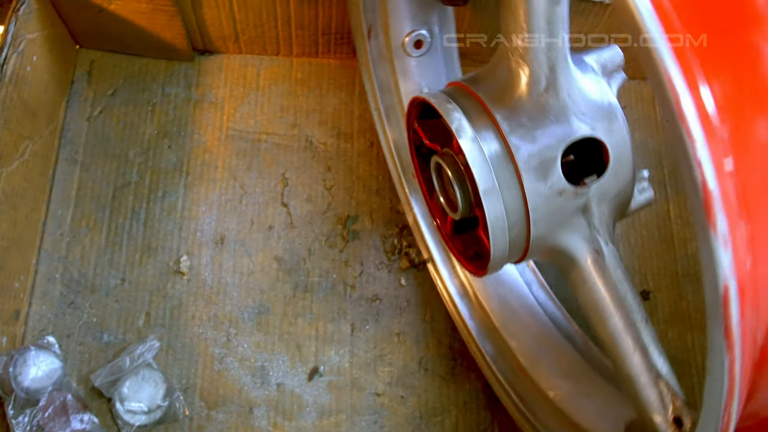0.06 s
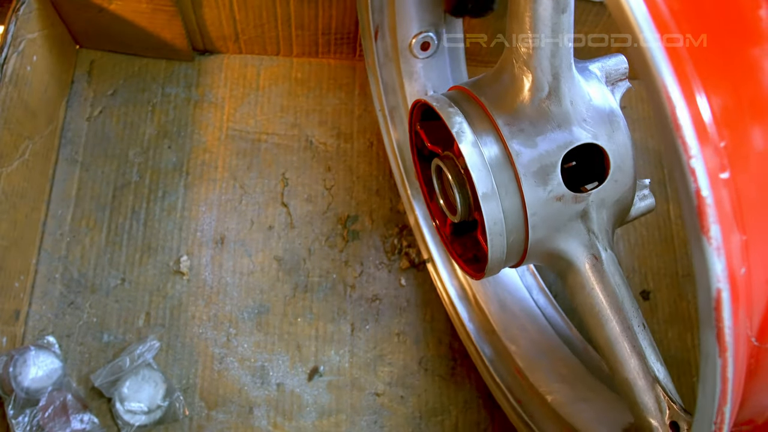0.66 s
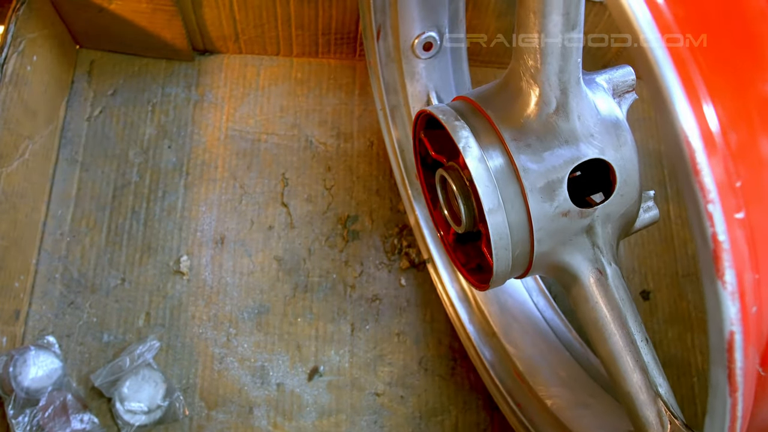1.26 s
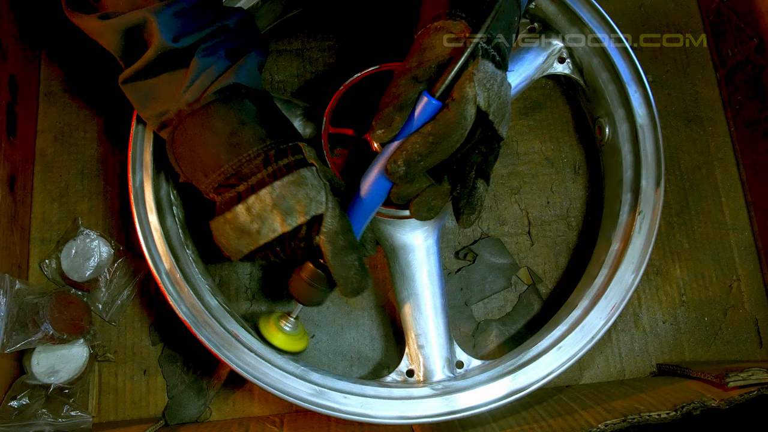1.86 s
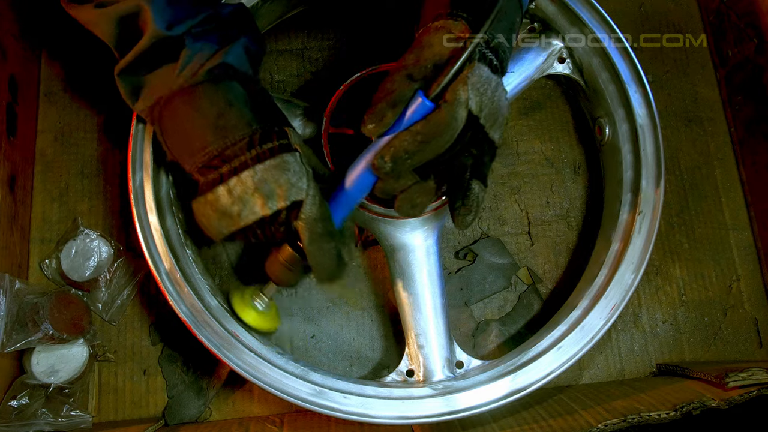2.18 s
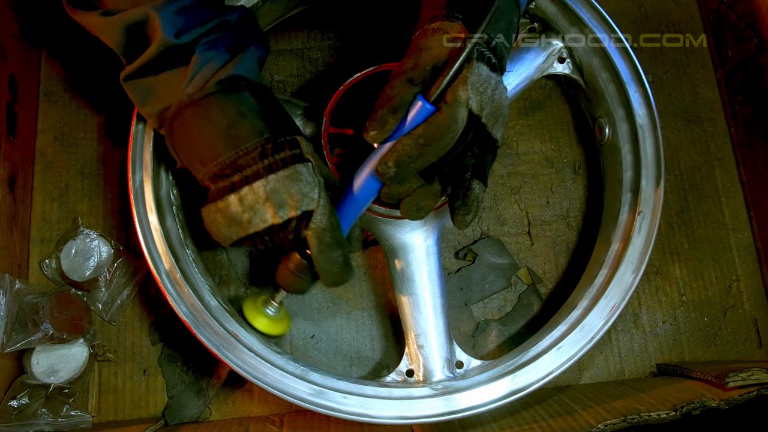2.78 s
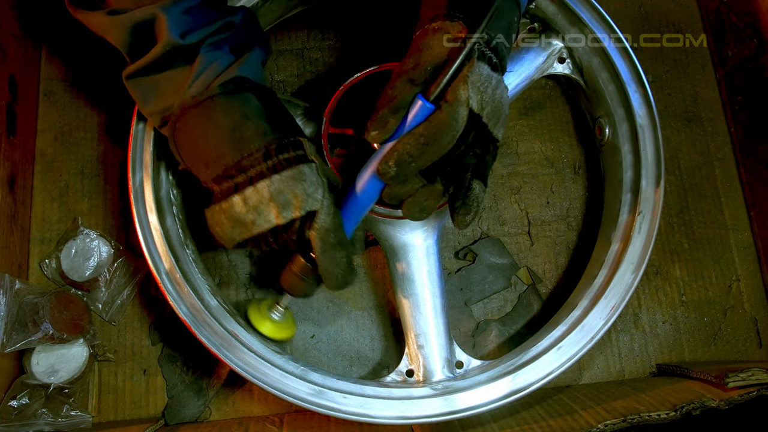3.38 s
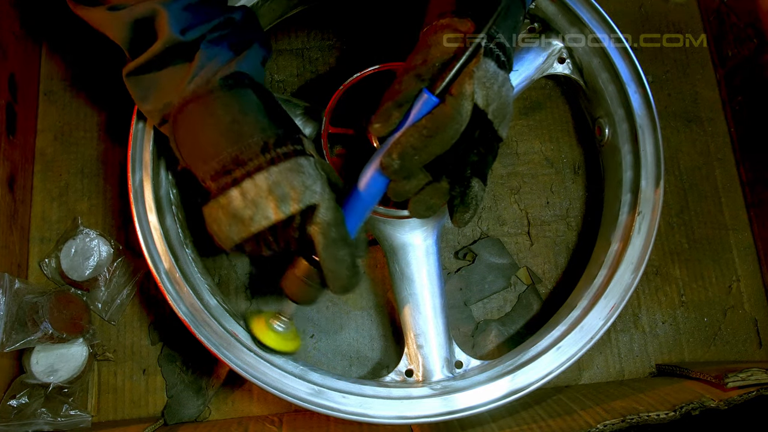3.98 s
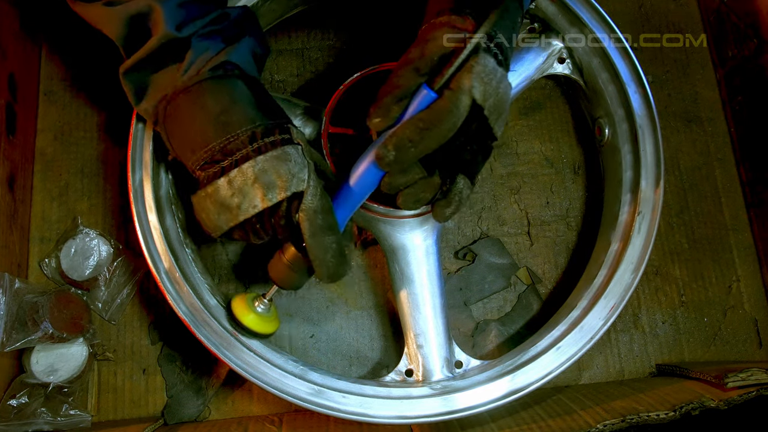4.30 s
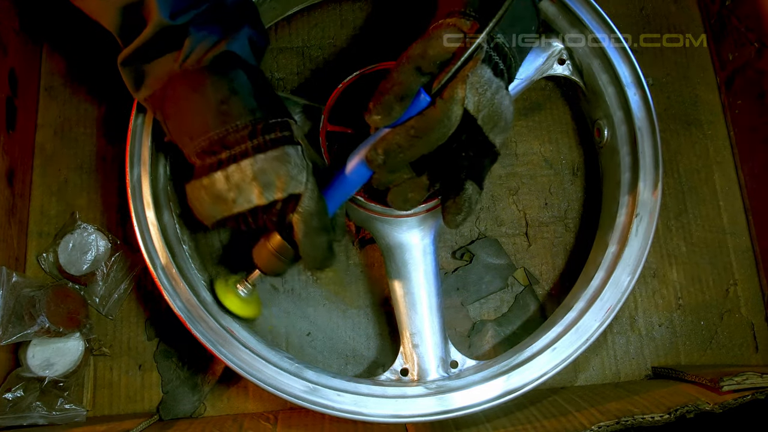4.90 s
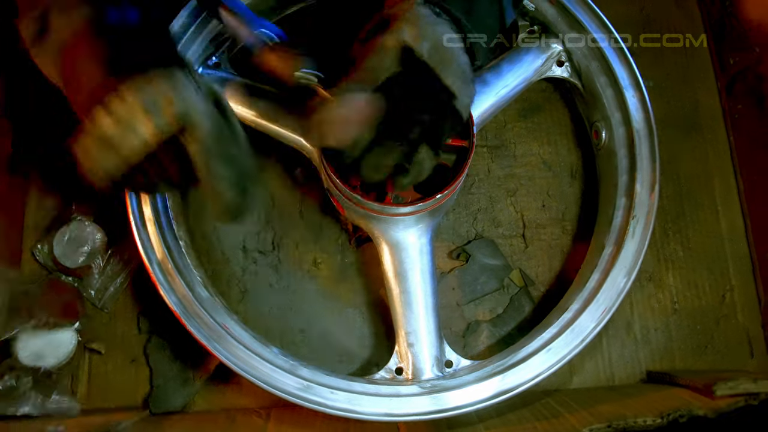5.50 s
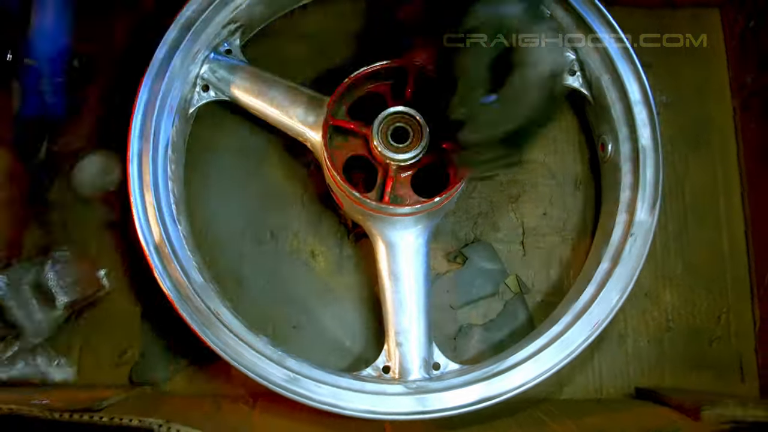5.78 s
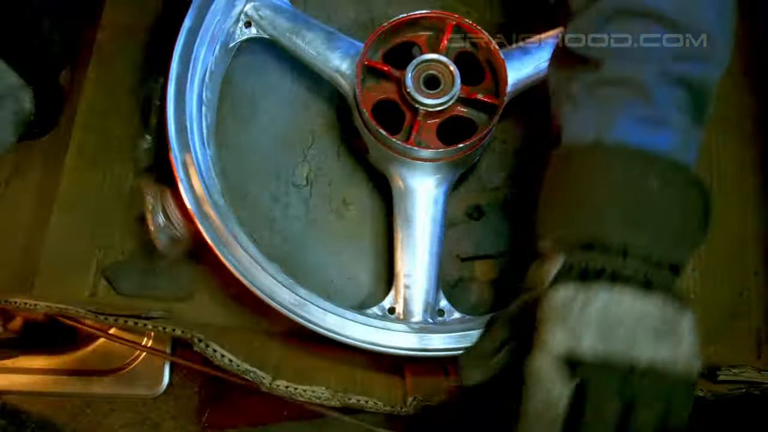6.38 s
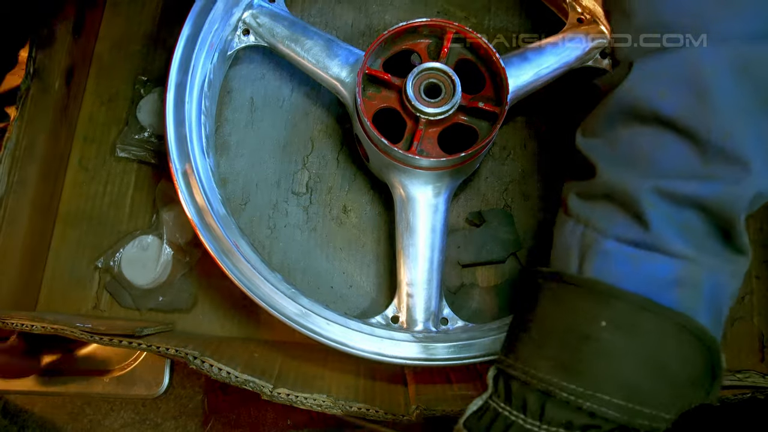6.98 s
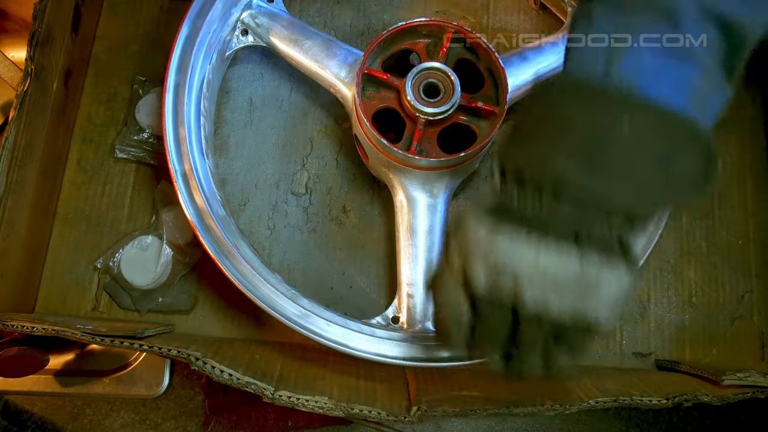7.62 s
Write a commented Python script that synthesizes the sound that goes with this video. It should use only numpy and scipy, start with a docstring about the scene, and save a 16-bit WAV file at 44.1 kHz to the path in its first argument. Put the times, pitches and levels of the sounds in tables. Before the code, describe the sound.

Close by in a small workshop, an alloy wheel scrapes, squeals and clanks as it is moved. A rotary polishing tool then starts abruptly and holds a high, buzzing whine for nearly four seconds, wavering slightly against the metal. It winds down and is put aside with a sharp thump. Cloth and cardboard rustle, plastic crinkles faintly, and the wheel bumps and scrapes into a new position.

```python
"""Polishing an alloy wheel

An alloy wheel scrapes, squeals and knocks as it is shifted in a cardboard-lined work bay. A high-speed
rotary tool whines with its polishing pad on the rim, sags under pressure and runs down. It is put aside
with a few thuds; sleeves, cardboard and plastic bags rustle while the wheel is pushed to a new place."""
import sys
import numpy as np
from scipy import signal
from scipy.fft import rfft, irfft, next_fast_len
from scipy.io import wavfile

SR = 44100
rng = np.random.default_rng(int(sys.argv[2]) if len(sys.argv) > 2 else 0)


def inscribe(sig):
    """Save sig as 16-bit PCM at rate SR to the path in sys.argv[1].

    A 1-D sig is mono; a 2-D sig holds one channel per row.
    Samples are clipped to [-1, 1] before scaling.
    """
    pcm = np.round(np.clip(np.atleast_2d(sig).T, -1, 1) * 32767)
    wavfile.write(sys.argv[1], SR, pcm.astype(np.int16))


N = 337365
TIME = np.arange(N) / SR

# Table levels are relative: each layer sets its own trim.
# the shaft sags under pressure, recovers, then runs down: (time [s], speed [Hz])
SHAFT_SPEED = [(1.9, 455.4), (2.14, 453.4), (2.32, 456.2), (2.73, 454.4), (2.95, 453.8), (3.12, 454.3),
               (3.3, 450.8), (4.14, 445.3), (4.33, 434.1), (4.56, 457.8), (4.71, 467.1), (4.86, 462.7),
               (5.05, 454.3), (5.22, 452), (5.44, 431.8), (5.5, 411.7), (5.56, 379), (5.68, 326)]
# the backbone of the whine: (shaft multiple, level [dB], lift in a full stroke [dB])
MAIN_ORDERS = [(1, -34, -1), (2, -22, 3), (3, -42.5, 17.5), (4, -37.5, 10), (7, -51, 9.5), (8, -43.5, 0),
               (12, -44, -6)]
# lesser overtones that ride the rush's fader: (shaft multiple, level [dB])
WEAK_ORDERS = [(5, -7.5), (6, -10), (9, -17.5), (11, -26), (13, -19), (19, -26.5)]
# peaks and dips that the main orders sweep through: (frequency [Hz], half width [Hz], gain [dB])
WHINE_RESPONSE = [(428, 14.6, -7.5), (468.8, 13.8, 5), (889, 22.1, -14.5), (927, 5.3, 2.5), (2750, 41, 14),
                  (3113, 308, 16), (3737, 51, 8), (4840, 400, -8)]
# stereo image of the whine: (frequency [Hz], pan left [dB], left phase lead [rad])
WHINE_IMAGE = [(450, 8, .1), (900, 0, .7), (1370, 4, -.7), (1820, 0, 1.5), (2270, 0, -.6), (3150, -.5, -.3),
               (6000, 0, 0)]
# pad strokes that make the rim sing: (centre [s], half length [s], strength [0-1])
PAD_STROKES = [(1.99, 0.065, 0.7), (2.33, 0.14, 0.63), (2.73, 0.13, 0.67), (3.12, 0.038, 0.44),
               (4.54, 0.05, 0.44), (4.91, 0.18, 0.46), (5.36, 0.037, 0.24)]
# orders flare or fade as the pad shifts: (centre [s], half length [s], shaft multiple, gain [dB])
FLARES = [(2.334, 0.047, 5, -18), (2.33, .08, 7, 2), (2.75, 0.66, 13, 3), (2.966, 0.081, 4, -8),
          (3.347, 0.16, 3, -6.5), (3.6, 0.3, 5, 4.5), (3.898, 0.07, 2, -12), (3.98, 0.38, 9, 10),
          (4.254, .12, 6, 6.5), (4.403, .14, 5, 1.5), (4.413, 0.055, 4, -6), (4.6, 0.046, 11, 16),
          (4.71, .16, 5, -13), (4.72, 0.075, 4, 4), (4.9, .07, 11, 16), (5.332, 0.024, 12, 7),
          (5.436, 0.032, 2, -25), (5.446, .06, 4, 8), (5.5, 0.037, 8, 2), (5.58, 0.055, 11, 20)]
# fader for the rush of fan and pad: (time [s], level [dB])
RUSH_FADER = [(1.9, -38), (3.3, -38.5), (4.4, -38.5), (5.0, -39.5), (5.55, -39.5), (5.64, -54.5),
              (5.76, -55.5)]
# resonances of the tool's shell and the rim under the pad: (frequency [Hz], width [Hz], gain [dB])
SHELL_PEAKS = [(196.8, 9.7, 16), (653.4, 10, 11), (746, 14, 4.5), (2497, 30, 5), (2665, 73, 3.5),
               (3000, 900, 7), (9000, 1800, 4.5)]

# pushes, then soft scuffs as the wheel settles: (start [s], length [s], scrape [dB], drag [dB])
PUSHES = [(-0.04, 0.17, -34, -36.5), (.13, 0.12, -37, -41), (.24, 0.16, -34.5, -38.5),
          (.42, 0.18, -41, -39.5), (.56, 0.16, -34.5, -37), (.72, .19, -34.5, -33.5)]
SCUFFS = [(1.011, 0.025, -50.5, -38), (1.059, 0.029, -50, -47), (1.113, 0.287, -66, -77),
          (1.363, 0.092, -61.5, -61)]
# the rim sticks and squeals: (start [s], length [s], level [dB])
SQUEALS = [(.025, 0.047, -42), (.13, 0.15, -47), (.22, 0.2, -39), (.37, 0.1, -41), (.505, 0.031, -37.5),
           (.567, 0.03, -37.5), (.63, 0.07, -36.5), (.72, 0.13, -46), (.85, 0.05, -33), (1.18, 0.032, -64)]
# thin, high partials of the squeal: (frequency [Hz], width [Hz], level [dB])
SQUEAL_PARTIALS = [(5056, 36, 6.5), (9010, 80, -9.5), (10080, 81, -4), (10760, 60, -17), (13080, 80, -28)]
# resonances of the dragged wheel and the scraping rim: (frequency [Hz], width [Hz], gain [dB])
DRAG_PEAKS = [(97.2, 8.3, 22), (392, 22, 5.5), (614, 10.8, 12.5), (1270, 29, 13), (3220, 89, 9),
              (3580, 48, 13.5)]
RIM_PEAKS = [(1130, 44, 18.5), (1800, 600, 3), (2520, 800, 7.5)]
# knocks on the wheel:
# (time [s], level [dB], treble [dB], attack [s], t60 [s], ring [dB], pitch the struck spot favours [Hz])
KNOCKS = [(0.015, -21.5, 0, 0.0015, 0.17, -34, 3230), (0.0485, -11, 4, 0.00057, 0.15, -13, 1785),
          (0.409, -9, -2, 0.0017, 0.17, -12.5, 454), (0.764, -15.5, 2.5, 0.0034, 0.23, -14.5, 600),
          (0.774, -8.5, -8, 0.0025, 0.086, -15, 600), (1.177, -24.5, -9.5, 0.0026, 0.25, -7, 920),
          (6.394, -12, 1, 0.00085, 0.075, -20, 1310), (7.385, -26, -22, .001, 0.18, -5.5, 820),
          (7.456, -18, -17, 0.0017, 0.18, -14, 610)]
# ringing modes of the wheel: (frequency [Hz], level [dB], t60 [s])
WHEEL_MODES = [(454, -6, 0.5), (512, 5, 0.18), (610, -4, 0.18), (820, -6, 0.4), (927, -7.5, 0.25),
               (1215, -3, 0.23), (1310, -8, 0.23), (1680, -12.5, 0.32), (1785, -7, 0.37), (2120, -5, 0.26),
               (2970, 3, 0.22), (3350, -9, .13), (3750, -8, 0.17), (4760, -1.5, 0.1), (5100, -13, 0.3)]
# tool and wheel land on cardboard: (time [s], thump [dB], pitch [Hz], clack [dB], crack [dB], t60 [s])
THUDS = [(4.423, -19.5, 373, -20, -52, 0.066), (5.453, -14.5, 576, -36, -29, 0.046),
         (5.572, -23, 753, -32, -22, 0.099), (5.644, -12, 544, -24, -32, 0.037),
         (5.654, 3.5, 533, -19, -18.5, 0.0093), (5.705, -25, 702, -31, -43, 0.026),
         (5.7292, -10, 353, -19, -26, 0.075), (5.798, -20, 359, -17, -40, 0.085),
         (5.843, -17.5, 177, -18, -21, 0.063), (5.862, -28, 600, -26, -32, 0.041),
         (5.918, -22, 333, -25, -38, 0.1), (5.945, -15.5, 354, -31, -34, 0.045),
         (5.956, -24, 360, -42, -51, 0.07), (6.052, -24, 246, -33, -16, 0.05),
         (6.072, -18.5, 342, -41, -29, 0.11), (6.109, -22.5, 626, -26, -27.5, 0.09),
         (6.162, -34, 398, -35, -26, 0.13), (6.222, -31, 630, -22, -26, 0.077),
         (6.395, -17, 280, -16, -37, 0.14), (6.436, -26, 543, -18, -28.5, 0.085),
         (6.77, -48, 300, -38, -57, .03), (6.838, -22, 348, -25, -52.5, 0.06),
         (6.894, -29, 300, -34, -61, 0.041), (7.087, -31, 290, -41, -31, 0.14),
         (7.17, -28, 200, -24, -42, 0.03), (7.193, -17.5, 225, -50, -56, 0.11),
         (7.206, -23.5, 272, -48, -56, 0.056), (7.244, -27, 205, -33, -45, 0.075)]
# moves of sleeves and cardboard: (start [s], length [s], rustle [dB], rumble [dB])
MOVES = [(5.56, 0.23, -40, -26.5), (5.81, 0.077, -32.5, -27.5), (5.92, 0.053, -34.5, -24.5),
         (5.99, 0.16, -36, -31), (6.105, 0.089, -32, -28.5), (6.2, 0.068, -32, -30.5),
         (6.3, 0.083, -33.5, -25.5), (6.41, 0.065, -28, -27.5), (6.48, 0.11, -31, -29),
         (6.64, 0.075, -46, -36), (6.76, 0.21, -62.5, -45), (6.93, 0.066, -50.5, -39),
         (7.0, 0.13, -45.5, -41.5), (7.08, 0.12, -34, -30.5), (7.22, 0.095, -42, -37.5),
         (7.36, 0.15, -62, -40)]
# the pushed rim bears on the floor: (time [s], share of scrape in the rustle [0-1], pitch [Hz])
RIM_CONTACT = [(6.36, 0.01, 3100), (6.44, 0.65, 3050), (6.6, 0.7, 2750), (6.72, 0.3, 2750),
               (7.05, 0.02, 3200), (7.1, 0.7, 3150), (7.17, 0, 2900), (7.33, 0.8, 2450)]
# brushes against plastic bags: (start [s], length [s], level [dB])
CRINKLES = [(5.83, 0.0076, -31.5), (6.13, 0.019, -33.5), (6.205, 0.025, -29), (6.53, 0.012, -36)]

# EQ curves of the noise layers: (frequency [Hz], level [dB])
RUSH_EQ = [(29, -65), (50, -32), (189, -21), (326, -16), (499, -9), (950, -10.5), (1560, -15.5),
           (2760, -16.5), (4500, -21), (6030, -20.5), (7640, -31.5), (10500, -26), (11800, -38.5),
           (14500, -71)]  # fan and pad
RASP_EQ = [(2150, -61), (2500, -1), (2580, 5), (2700, -1), (3000, -54)]  # loaded pad
SCRAPE_EQ = [(400, -28.5), (700, -7.5), (2150, -8), (3000, 0), (3650, -5), (4200, -11), (5200, -12.5),
             (6700, -12.5), (7600, -21.5), (8400, -39), (10500, -21.5), (12000, -69)]  # rim on the floor
DRAG_EQ = [(24, -78), (40, -27), (97, -17.5), (205, 2), (227, -2.5), (401, -1), (476, -9), (606, -4.5),
           (1200, -25.5), (1560, -60), (2640, -120)]  # low end of the slide
KNOCK_EQ = [(47, -44), (90, -31), (200, -7), (348, -12.5), (510, -1), (700, -16.5), (850, -10.5),
            (1450, -9.5), (2370, -12), (2930, -9), (5200, -14), (7000, -23), (10100, -27.5), (13000, -58)]  # clatter of the wheel
THUD_EQ = [(50, -46), (100, -8.5), (170, 6), (300, 2), (650, -9), (1100, -8.5), (2000, -9.5), (4000, -75)]  # body of a thud
CLACK_EQ = [(250, -33), (520, 10.5), (680, 3), (860, -4), (1120, -1), (1600, -13), (2600, -32.5),
            (5000, -50)]  # hollow cardboard panel
CRACK_EQ = [(600, -48), (1500, -0.5), (3000, 9), (5000, -1.5), (7500, -12), (10500, -14.5), (14000, -39)]  # bright edge of a thud
RUSTLE_EQ = [(530, -1), (900, 6), (1400, 4), (1850, 1.5), (3000, 2), (3550, 1), (4590, -6), (6200, -6.5),
             (7740, -15), (10000, -14), (11600, -25), (12600, -46), (14500, -69)]  # cloth and cardboard
RUMBLE_EQ = [(30, -50), (70, -13), (120, -9), (224, 5), (294, 0), (363, 4.5), (430, -5.5), (617, 2.5),
             (760, -11), (1400, -15), (2000, -63)]  # weight under the rustle
CRINKLE_EQ = [(1500, -31), (4200, 3.5), (6500, -2.5), (10500, -5), (12000, -14), (14500, -41)]  # plastic bags
ROOM_TONE_EQ = [(18, -45), (30, -15.5), (246, -2), (954, -13), (2130, -21), (3690, -22), (8030, -35),
                (12000, -36.5), (15600, -62.5)]  # quiet workshop

# stereo images of the tool and of all other noises: (frequency [Hz], left-right likeness, pan left [dB])
TOOL_IMAGE = [(60, -0.87, 2.5), (207, 0.12, -2.5), (510, 0.7, 4), (1330, -0.37, 5.5), (2390, -0.081, -1.5),
              (4170, 0.81, -1), (7860, 0.93, 0.5)]
NEAR_IMAGE = [(40, .5, 3), (130, 0.96, -1.5), (300, 0.82, -1), (600, 0.82, 2), (1300, 0.24, 3.5),
              (2500, 0.21, 1.5), (5000, 0.95, -1), (10000, 0.86, 0.5)]
# decay of the workshop's reverb: (frequency [Hz], t60 [s])
ROOM_T60 = [(100, 0.36), (500, 0.33), (3000, 0.19), (12000, 0.056)]

TOOL_ON_S = 1.893


def rotary_tool(light_touch_hz=459, full_sag_hz=14, fan_throb=0.26):
    """The motor whines over the rush of fan and pad, which throbs once a turn; the loaded pad rasps."""
    speed_hz, = in_time(SHAFT_SPEED)
    rush_db, = in_time(RUSH_FADER)
    load = np.clip((light_touch_hz - speed_hz) / full_sag_hz, 0, 1)
    coasting = ramp(5.38, 0.22)
    # the pad grabs and slips, shaking the speed: more under load, most when coasting
    chatter = 0.0016 + 0.0026 * load + 0.012 * coasting
    unsteady_hz = speed_hz * (1 + 0.001495 * wander(16.6) + chatter * wander(171))
    angle = 2 * np.pi * np.cumsum(unsteady_hz) / SR
    whine = motor_whine(angle, speed_hz, rush_db, coasting) * fade_out(5.645, 0.026)
    rush = noise(RUSH_EQ, TOOL_IMAGE, SHELL_PEAKS, grain_db=1, drive=1 + fan_throb * np.cos(angle))
    rush *= amp(rush_db + 9) * fade_out(5.77, 0.26)
    rasp = amp(-38) * load * fade_out(5.45, 0.042) * noise(RASP_EQ, TOOL_IMAGE, grain_db=3.5)
    return ramp(TOOL_ON_S, 0.0031) * (whine + rush + rasp)


def motor_whine(angle, speed_hz, rush_db, coasting, rattle_depth=0.61):
    """A stack of shaft orders, broken up by the rattling pad as the tool runs down."""
    stroke = bumps(PAD_STROKES, TIME)
    # main orders lift with each stroke and with the resonances they pass; high ones swell most
    orders = [(k, db + lift_db * stroke + bumps(WHINE_RESPONSE, k * speed_hz), 0.213 * k)
              for k, db, lift_db in MAIN_ORDERS]
    # lesser orders swell and fade as the tool turns in the hand
    orders += [(k, db + rush_db + 8, 2.5) for k, db in WEAK_ORDERS]
    whine = 0
    for multiple, level_db, swell_db in orders:
        flare_db = bumps([(s, half, db) for s, half, k, db in FLARES if k == multiple], TIME)
        rattle = 1 + rattle_depth * coasting * np.tanh(wander(120))
        tone = shaft_order(angle + rng.uniform(0, 2 * np.pi), multiple, speed_hz, swell_db)
        whine += amp(level_db + flare_db) * rattle * tone
    return whine


def shaft_order(angle, multiple, speed_hz, swell_db):
    """One partial of the whine: high ones flutter most, and moving reflections sway its stereo phase."""
    pan_db, lead = at_hz(WHINE_IMAGE, multiple * np.median(speed_hz))
    flutter = min(0.06 + 0.018 * multiple, 0.4)
    level = (1 + flutter * wander(29)) * amp(swell_db * wander(6.4))
    spread = lead / 2 + 0.25 * wander(5)
    left = amp(pan_db / 2) * np.cos(multiple * angle + spread)
    right = amp(-pan_db / 2) * np.cos(multiple * angle - spread)
    return np.sqrt(2) * level * np.array([left, right])


def wheel_slide():
    """The rim crosses the floor with a scrape, a squeal and a low drag, then settles in soft scuffs."""
    scraping, dragging = gestures(PUSHES + SCUFFS, attack_s=0.043, fall_db_per_s=305)
    sticking, = gestures(SQUEALS, attack_s=0.0084, fall_db_per_s=338)
    weight = fade_out(0.88, 0.22)
    scrape = weight * noise(SCRAPE_EQ, peaks=DRAG_PEAKS)
    scuff = (1 - weight) * noise(RUSTLE_EQ, grain_db=2.5)
    drag = noise(DRAG_EQ, peaks=DRAG_PEAKS)
    slide = scraping * (scrape + scuff) + dragging * drag + sticking * rim_squeal()
    return slide * amp(wander(25) - 1) * fade_out(TOOL_ON_S, 0.003)


def rim_squeal(saturation=0.37, sputter_db_per_hz=0.0005):
    """Stick and slip keep narrow high partials singing at a limited swing; high ones sputter most."""
    squeal = 0
    for hz, width, db in SQUEAL_PARTIALS:
        swing = wander(width / 2) + 1j * wander(width / 2)
        limited = swing / np.sqrt(abs(swing) ** 2 + saturation ** 2)
        sputter = unit(amp(sputter_db_per_hz * hz * np.tanh(wander(14))))
        squeal += amp(db) * sputter * (limited * np.exp(2j * np.pi * hz * TIME)).real
    stutter = amp(3.5 * wander(160))
    return unit(squeal * stutter)


def wheel_knocks(fizz_hz=5500, fizz_fall_db_per_s=350, spot_width_hz=100, spot_db=9, treble_hz=1100):
    """Each knock is a dense clatter whose top dies first and that leaves the wheel's modes ringing."""
    out, t = np.zeros((2, N)), TIME[:SR * 3 // 4]
    clatter = noise(KNOCK_EQ, grain_db=2)
    for s, db, treble_db, attack_s, t60, ring_db, spot_hz in KNOCKS:
        burst = clatter[:, random_span(len(t))] * decay(t, t60)
        core = signal.filtfilt(*signal.butter(2, fizz_hz, fs=SR), burst)
        fizz = (burst - core) * amp(-fizz_fall_db_per_s * t)
        ring = 0
        for hz, mode_db, mode_t60 in WHEEL_MODES:
            favour_db = bumps([(spot_hz, spot_width_hz, spot_db)], hz)
            phase = 2 * np.pi * (hz * t + rng.random()) + rng.normal(0, 0.5, (2, 1))
            ring += amp(mode_db + favour_db) * decay(t, mode_t60) * np.sin(phase)
        knock = attack(t, attack_s) * (amp(-9) * (core + fizz) + amp(ring_db - 6) * ring)
        dull = signal.lfilter(*signal.butter(2, treble_hz, fs=SR), knock)
        bright = -signal.lfilter(*signal.butter(2, treble_hz, "highpass", fs=SR), knock)
        add(out, s, amp(db) * (dull + amp(treble_db) * bright))
    return out


def cardboard_thuds(attack_s=0.00038, attack_cycles=0.24, clack_t60=0.05):
    """Blows on cardboard: a damped low note, a dull body around its pitch, a hollow clack and a crack."""
    out, t = np.zeros((2, N)), TIME[:SR // 3]
    body, clack = noise(THUD_EQ), noise(CLACK_EQ)
    crack = noise(CRACK_EQ, grain_db=1, ripple_db=2.5)
    for s, thump_db, hz, clack_db, crack_db, t60 in THUDS:
        span = random_span(len(t))
        body_band = signal.butter(2, [0.46 * hz, 3.07 * hz], "bandpass", fs=SR)
        dull = amp(-2) * unit(signal.lfilter(*body_band, body[:, span]))
        note = amp([[4], [2]]) * np.sin(2 * np.pi * hz * t)  # a little to the left
        thump = amp(thump_db) * (note + dull) * attack(t, attack_cycles / hz)
        blow = (thump + amp(crack_db + 2) * crack[:, span]) * decay(t, t60)
        panel = amp(clack_db) * clack[:, span] * decay(t, clack_t60)
        add(out, s, (blow + panel) * attack(t, attack_s))
    return out


def handling(ticks_per_s=90):
    """Cloth and cardboard rub and tick over a rumble; the rim bears down and scrapes at a sliding pitch."""
    rubbing, rumbling = gestures(MOVES, attack_s=0.017, fall_db_per_s=208.5)
    contact, sing_hz = in_time(RIM_CONTACT)
    arm = wander(2.9)  # the moving arm crossfades two colours of rustle
    cloth = amp(0.5) * sum(share * noise(RUSTLE_EQ, grain_db=1, ripple_db=8)
                           for share in (np.cos(arm), np.sin(arm)))
    grit = noise(SCRAPE_EQ, peaks=RIM_PEAKS, grain_db=2.4)
    scrape = amp(1) * unit(grit + amp(5) * resonate(grit, sing_hz, width_hz=800))
    catches = np.convolve(rng.random(N) < ticks_per_s / SR, np.hanning(SR // 500), "same")
    ticks = amp(-7.5) * noise(RUSTLE_EQ, drive=catches)
    clumps = amp(wander(50))
    rub = np.sqrt(1 - contact) * cloth + np.sqrt(contact) * scrape + ticks
    return rubbing * clumps * rub + amp(-2) * rumbling * noise(RUMBLE_EQ)


def bag_crinkles():
    """Brushed plastic gives short flurries of sharp, bright grains."""
    flurry, = gestures(CRINKLES, attack_s=0.019, fall_db_per_s=404.5)
    return flurry * noise(CRINKLE_EQ, grain_db=2.2)


def room_reverb(x, wet_db):
    """Adds the workshop's short diffuse tail, whose treble dies first."""
    hz, t, spectrum = signal.stft(rng.standard_normal((2, SR // 2)), SR, nperseg=256)
    t60, = at_hz(ROOM_T60, hz)
    _, tail = signal.istft(spectrum * decay(t, t60[:, None]) * (t > 0), SR, nperseg=256)
    return x + amp(wet_db) * signal.fftconvolve(x, tail / np.linalg.norm(tail[0]), axes=1)[:, :N]


def room_tone():
    """The faint, dark bed of the quiet workshop."""
    return amp(-69) * noise(ROOM_TONE_EQ)


def noise(eq, image=NEAR_IMAGE, peaks=(), grain_db=0, drive=1, ripple_db=0):
    """Stereo noise in grains of uneven size, coloured by an EQ, resonances and near reflections."""
    size = next_fast_len(N, True)
    hz = np.fft.rfftfreq(size, 1 / SR)
    grain_sizes = np.minimum(rng.exponential(1, N // 32 + 1), 5)
    grains = amp(grain_db * np.repeat(grain_sizes, 32)[:N])
    mid, side = rfft(rng.standard_normal((2, N)) * grains * drive, size)
    knots_hz = np.arange(0, SR / 2, 45)  # reflections ripple the spectrum, most in the treble
    ripple = np.interp(hz, knots_hz, np.tanh(rng.standard_normal(len(knots_hz))))
    gain = amp(at_hz(eq, hz)[0] + ripple_db * ripple * np.minimum(hz / 4000, 1))
    for centre, width, db in peaks:
        gain *= 1 + (amp(db) - 1) / (1 + (2 * (hz - centre) / width) ** 2)
    likeness, pan_db = at_hz(image, hz)
    likeness = np.clip(likeness, -0.6, 0.99)
    side *= np.sqrt((1 - likeness) / (1 + likeness))
    stereo = np.array([(mid + side) * amp(pan_db / 2), (mid - side) * amp(-pan_db / 2)])
    out = irfft(gain * stereo, size)[:, :N]
    return out / np.std(out.mean(0))


def gestures(rows, attack_s, fall_db_per_s):
    """One attack-hold-release envelope for each level column of (start [s], length [s], level [dB], ..)."""
    power = 0
    for start, length, *db in rows:
        shape = ramp(start, attack_s) * amp(-fall_db_per_s * np.maximum(TIME - start - length, 0))
        power += (amp(db)[:, None] * shape) ** 2
    return np.sqrt(power)


def wander(rate_hz):
    """Smooth random modulation of rms 1, moving at up to about rate_hz."""
    s = TIME[::64]
    hz = np.fft.rfftfreq(len(s), s[1])
    slow = irfft(rfft(rng.standard_normal(len(s))) / (1 + (hz / rate_hz) ** 4), len(s))
    return np.interp(TIME, s, unit(slow))


def resonate(x, hz, width_hz):
    """A swept resonance of gain 1 that follows the curve hz."""
    carrier = np.exp(2j * np.pi * np.cumsum(hz) / SR)
    pole = np.exp(-np.pi * width_hz / SR)
    return 2 * (carrier * signal.lfilter([1 - pole], [1, -pole], x / carrier)).real


def bumps(rows, x):
    """A sum of bell curves, one for each row (centre, half width, height)."""
    return sum(height * np.exp(-np.minimum(((x - centre) / half) ** 2, 20)) for centre, half, height in rows)


def at_hz(table, hz):
    """Every column of a table, read on a log-frequency axis."""
    f, *columns = np.transpose(table)
    return [np.interp(np.log(hz + 1), np.log(f + 1), c) for c in columns]


def in_time(table):
    """Every column of an automation table, read at each sample."""
    s, *columns = np.transpose(table)
    return [np.interp(TIME, s, c) for c in columns]


def ramp(s, length):
    """Rises from 0 to 1, starting at s."""
    return np.clip((TIME - s) / length, 0, 1)


def fade_out(s, length):
    """Falls from 1 to 0, starting at s."""
    return 1 - ramp(s, length)


def attack(t, rise_s):
    """Eases up from 0 towards 1."""
    return 1 - np.exp(-t / rise_s)


def decay(t, t60):
    """Dies away by 60 dB every t60."""
    return amp(-60 * t / t60)


def random_span(samples):
    """Indices of a random stretch of a noise layer."""
    return rng.integers(N - samples) + np.arange(samples)


def add(mix, s, sound):
    """Lays a stereo sound into the mix at time s."""
    part = mix[:, round(s * SR):][:, :sound.shape[1]]
    part += sound[:, :part.shape[1]]


def amp(db):
    """Decibels to gain."""
    return 10 ** (np.asarray(db) / 20)


def unit(x):
    """Scales to an rms of 1."""
    return x / np.sqrt(np.mean(x ** 2) + 1e-20)


def scene():
    """The full mix; only the knocks and thuds feed the reverb."""
    impacts = room_reverb(wheel_knocks() + cardboard_thuds(), wet_db=-13)
    return rotary_tool() + wheel_slide() + impacts + handling() + bag_crinkles() + room_tone()


def record(dry, low_cut_hz=55, high_cut_hz=14500):
    """The microphone's bass cut, a clip at full scale, then a steep high cut."""
    lean = signal.sosfilt(signal.butter(2, low_cut_hz, "highpass", fs=SR, output="sos"), dry)
    high_cut = signal.firwin(255, high_cut_hz, window=("kaiser", 9), fs=SR)
    return signal.oaconvolve(np.clip(lean, -1, 1), high_cut[None], "same")


dry = scene()
out = record(dry)
inscribe(out)
```